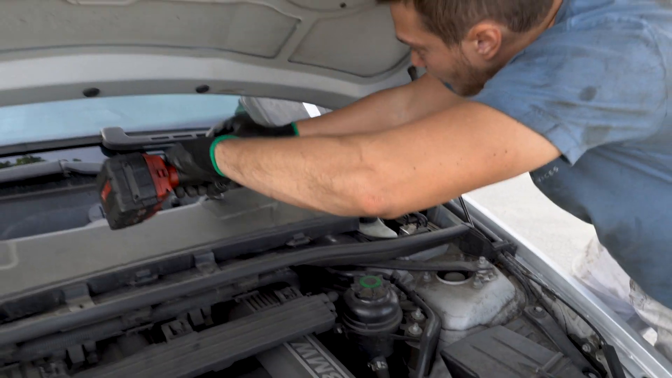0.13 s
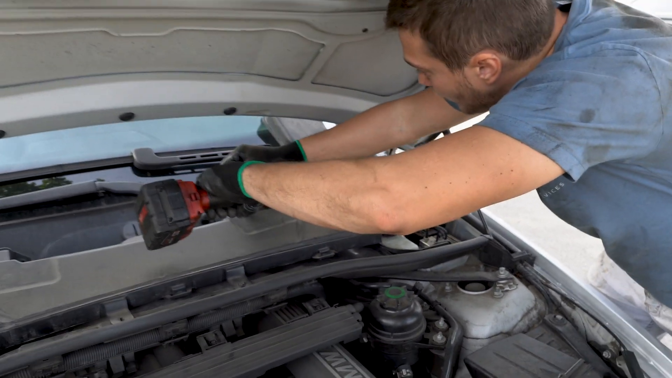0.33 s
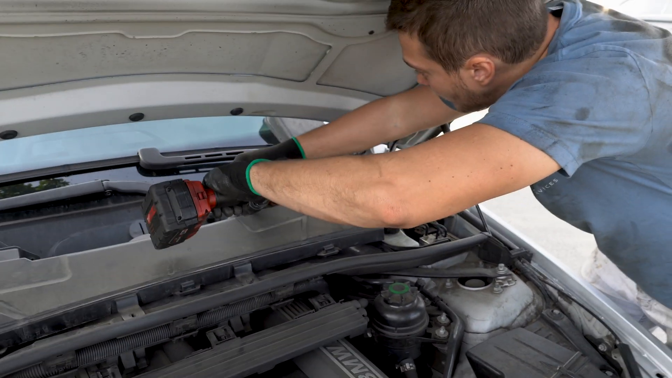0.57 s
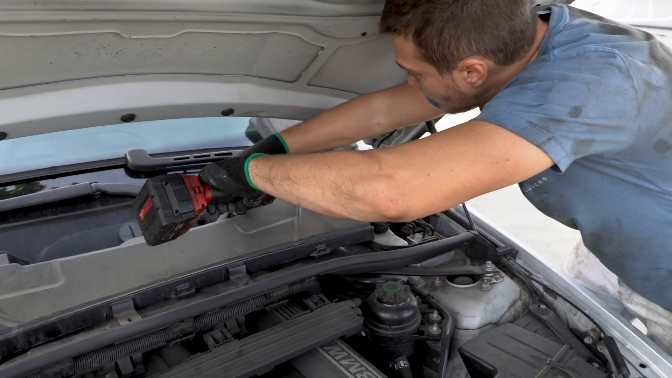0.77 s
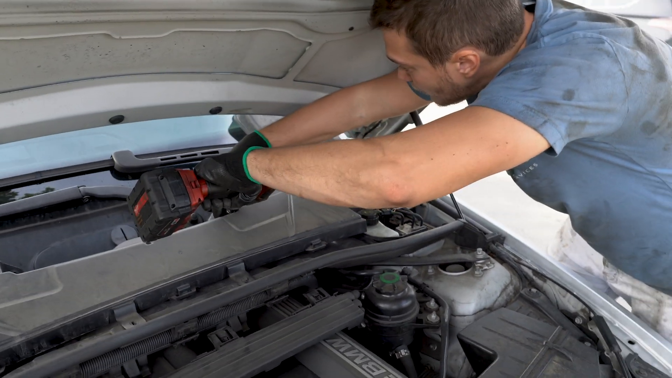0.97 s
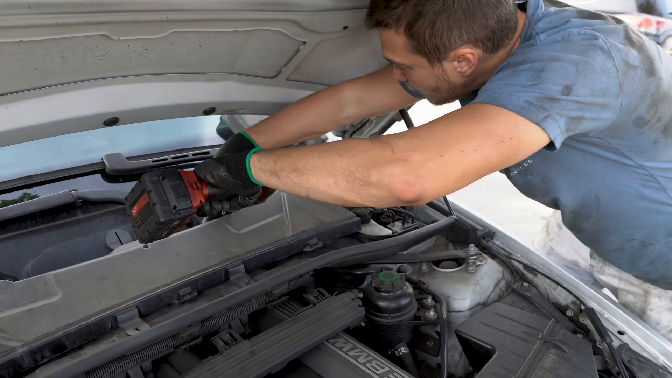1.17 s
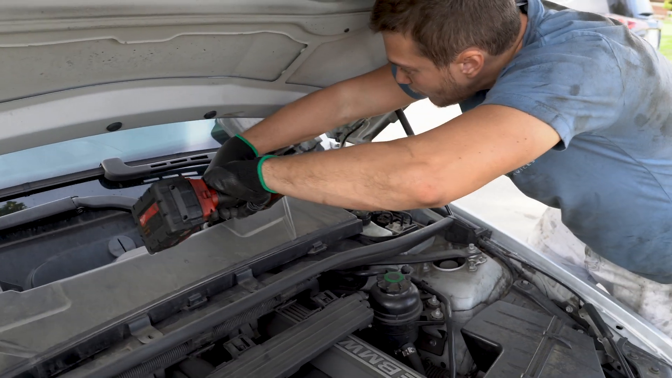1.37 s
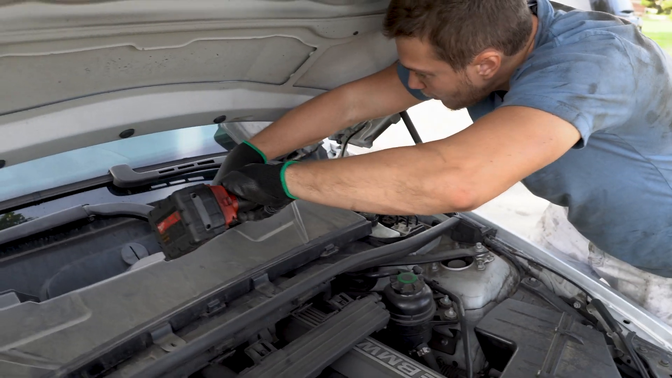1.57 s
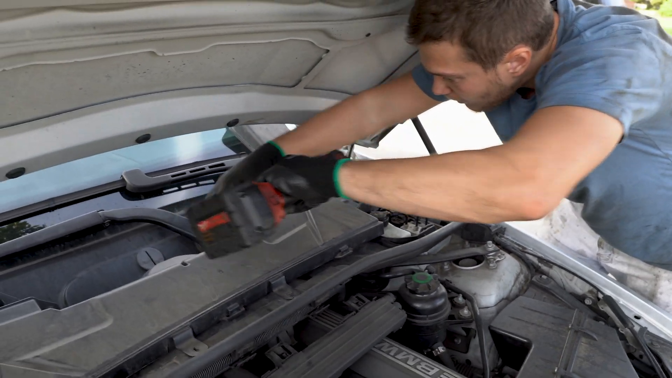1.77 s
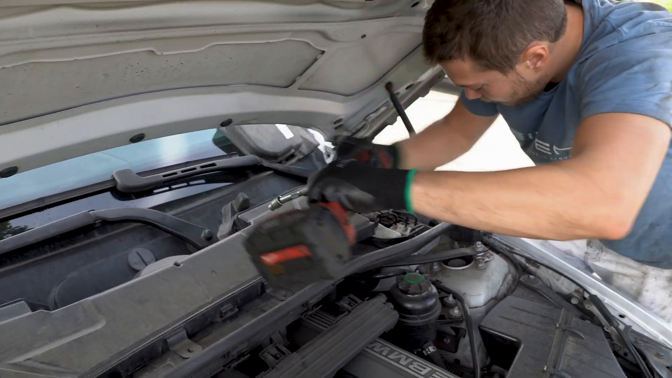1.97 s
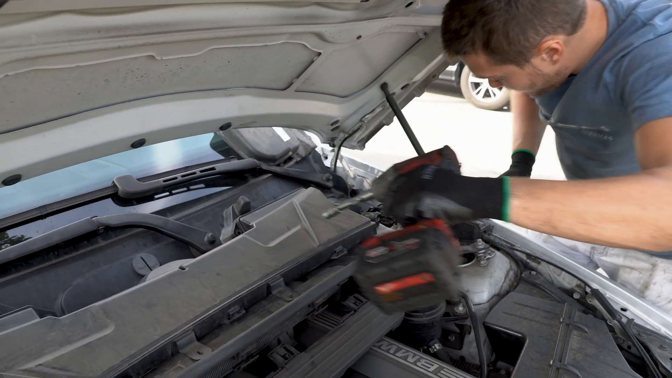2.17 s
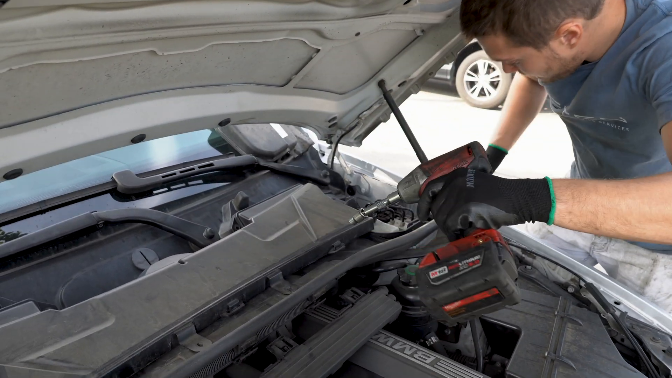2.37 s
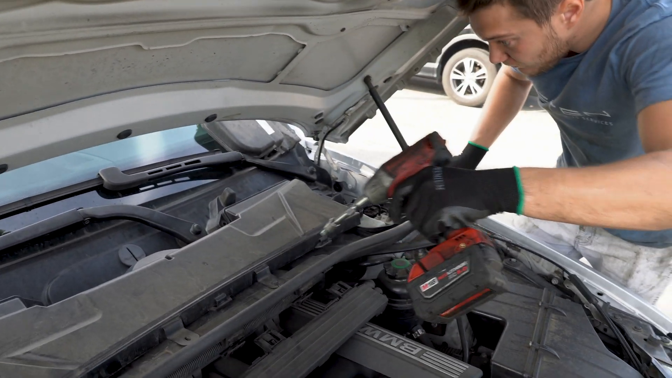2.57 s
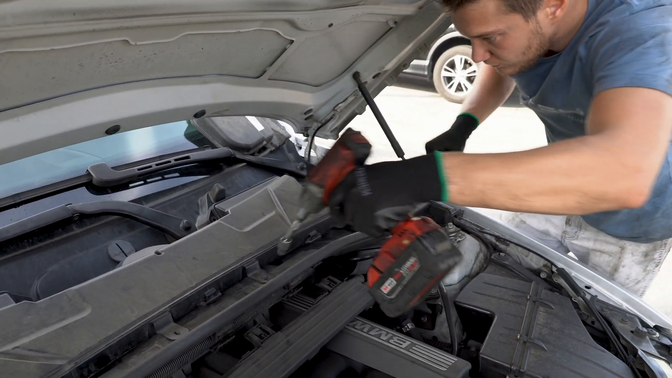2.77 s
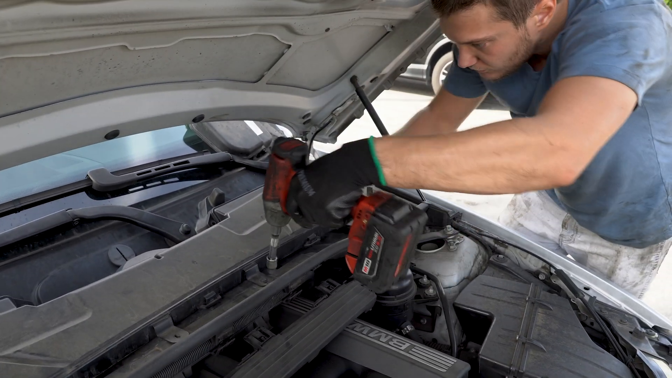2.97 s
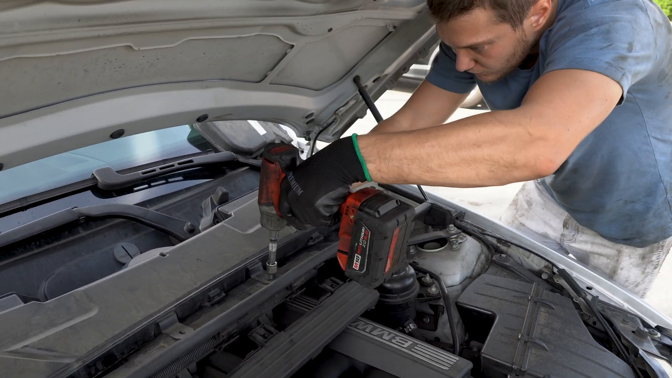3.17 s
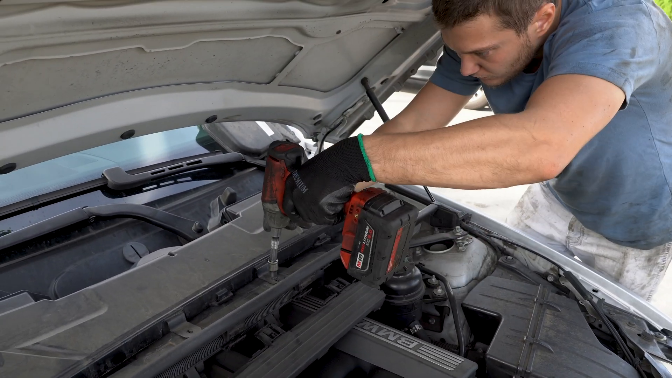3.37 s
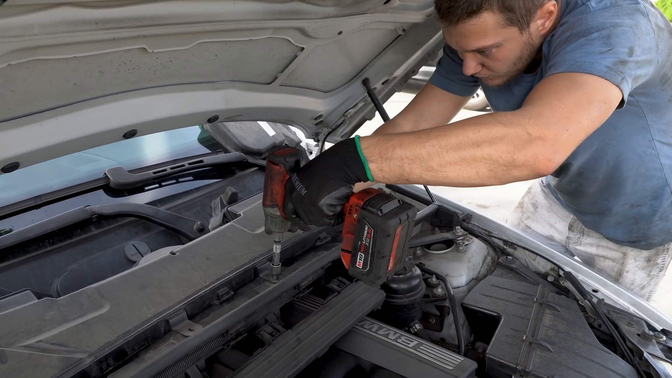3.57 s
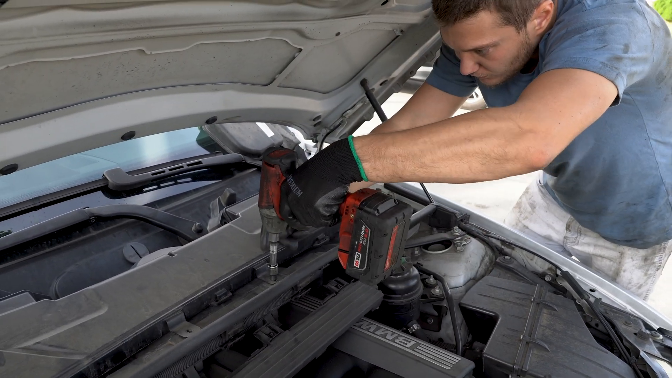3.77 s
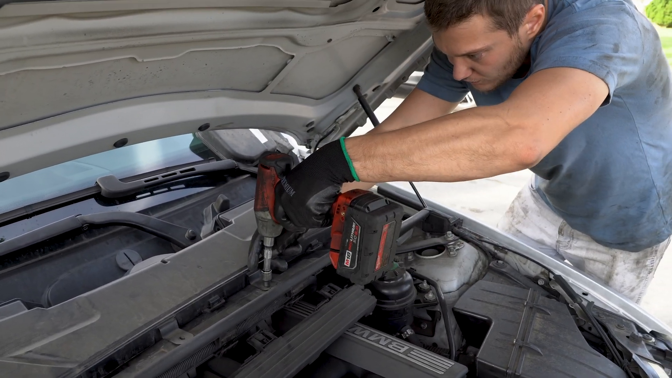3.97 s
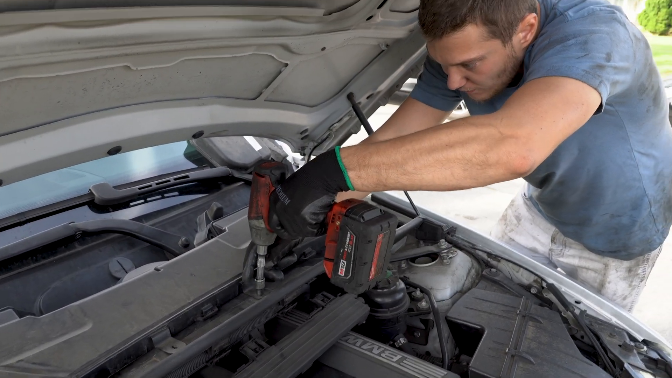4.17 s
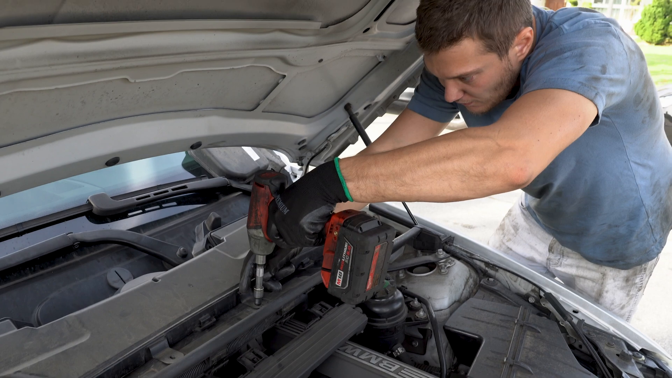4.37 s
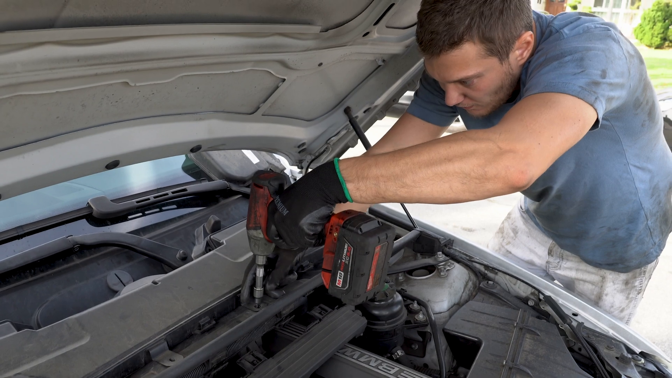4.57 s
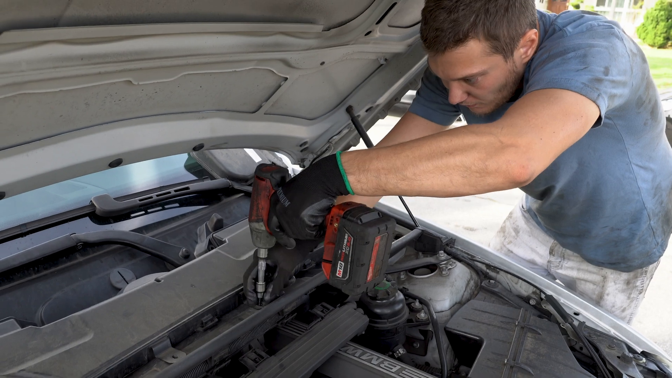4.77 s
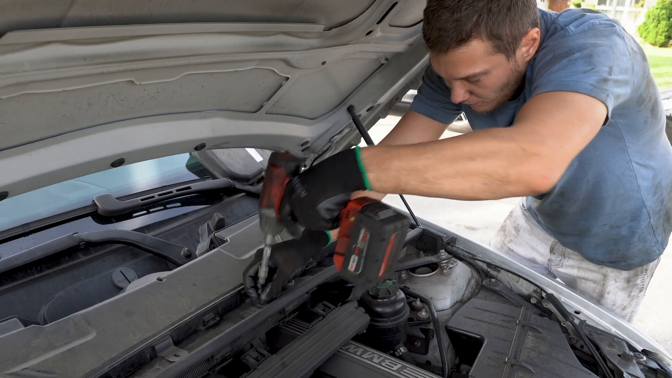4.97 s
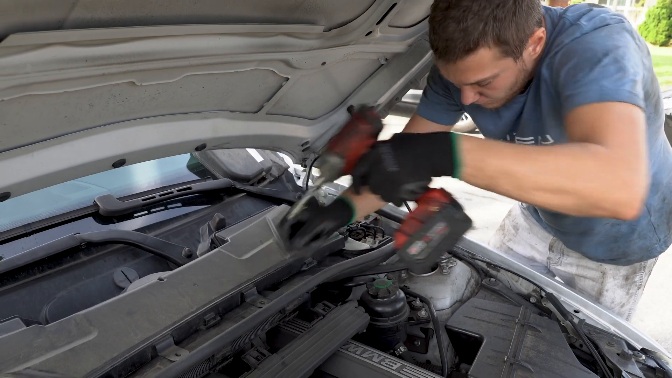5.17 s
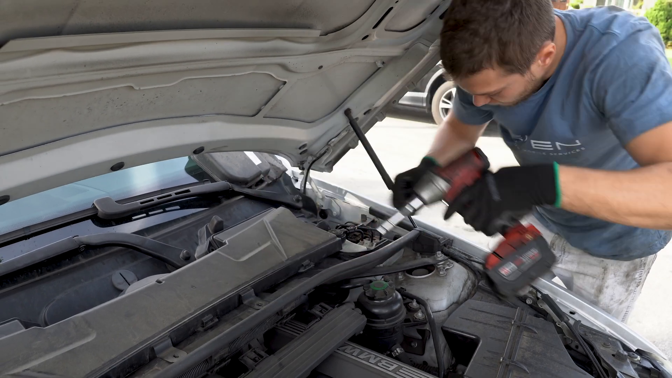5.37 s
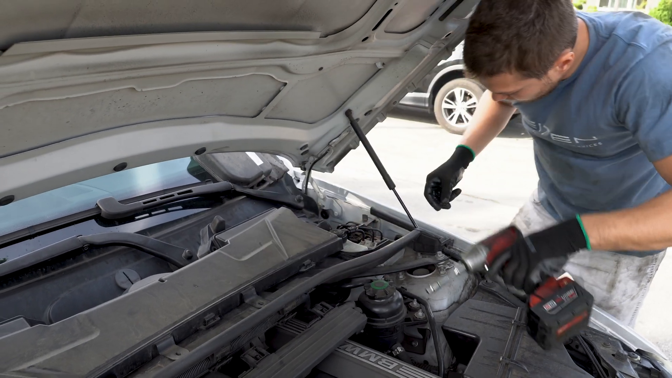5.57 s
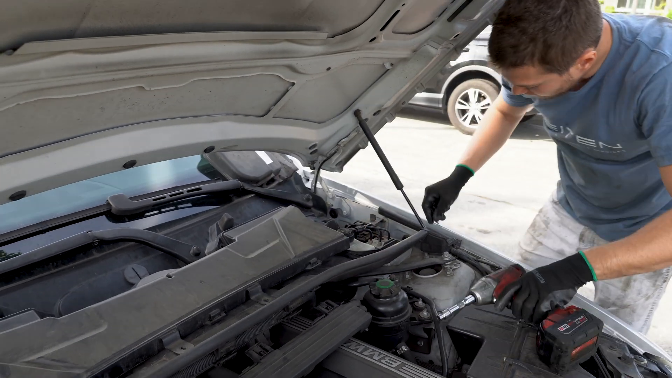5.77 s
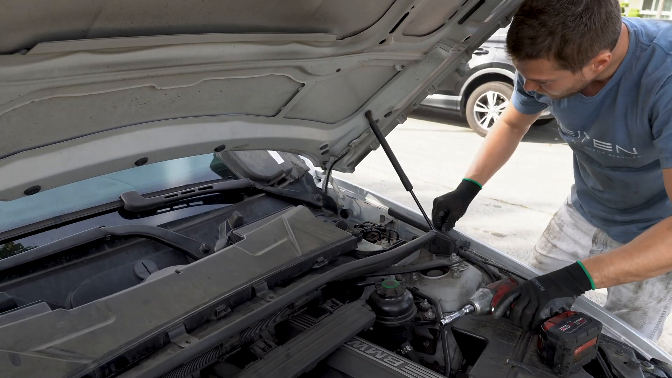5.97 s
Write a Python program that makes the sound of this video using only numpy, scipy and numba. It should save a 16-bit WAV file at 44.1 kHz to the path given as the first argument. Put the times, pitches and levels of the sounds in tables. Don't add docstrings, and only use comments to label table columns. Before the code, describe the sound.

A cordless driver whirs in two short, rattling bursts with a piercing high whistle, between plastic knocks, small metal clicks and a dropped bolt bouncing on steel.

```python
import sys
import numpy as np
from scipy import signal
from scipy.fft import rfft, irfft
from scipy.io import wavfile
from scipy.ndimage import uniform_filter1d
from numba import njit

SR = 44100
rng = np.random.default_rng(int(sys.argv[2]) if len(sys.argv) > 2 else 0)


def linear_from_db(decibels):
    return 10 ** (np.asarray(decibels, float) / 20)


def pcm_store(signal):
    levels = np.round(np.clip(np.atleast_2d(signal), -1, 1) * 32767)
    wavfile.write(sys.argv[1], SR, levels.astype(np.int16).T)


N = 265570
TIME = np.arange(N) / SR
FREQ = np.maximum(np.arange(N // 2 + 1) * SR / N, 1)

# [t/s, electrical f/Hz]
MOTOR_SPEED = [
    [(.838, 10), (.866, 235), (.935, 311), (1.17, 316), (1.225, 452), (1.3, 507), (1.36, 572), (1.44, 601),
     (1.5, 580)],
    [(4.327, 5), (4.345, 175), (4.37, 427), (4.4, 486), (4.43, 546), (4.49, 579), (4.62, 611), (4.775, 644),
     (4.835, 610)],
]
# [t/s, level/dB]
MOTOR_CURRENT = [
    [(.838, -42.5), (.92, -42), (1.16, -42), (1.2, -31), (1.24, -37), (1.3, -36), (1.46, -35.5),
     (1.48, -48)],
    [(4.328, -37.5), (4.345, -35), (4.4, -31), (4.5, -29.5), (4.77, -28), (4.793, -30)],
]
# [t/s, gear hiss level/dB, pressure on the cowl/dB]
SHAFT_LOAD = [
    [(.835, -36, -19), (.89, -40, -9), (.95, -44.5, -5), (1.15, -41, 0), (1.35, -38, 0.5), (1.43, -39, 4.5),
     (1.48, -41.5, 7), (1.52, -39, 7), (1.58, -75, 19.5)],
    [(4.331, -47.5, -7.5), (4.345, -39.5, -15.5), (4.37, -29, -18), (4.42, -34, -1.5), (4.5, -37, -1),
     (4.7, -38, -4), (4.83, -39, 0.5), (4.85, -52.5, 9), (4.9, -73, -4)],
]
# order in multiples of the speed, then level/dB under the lower sideband per burst
SIDEBAND_ORDERS = (-3, -.5, 0, .5, 2)
SIDEBAND_DB = [
    (-28, -21, -19, -43, -28),
    (-30.5, -30.5, -33.5, -22.5, -40.5),
]
# order (whole for poles, the rest tooth meshes), then level/dB per burst
GEAR_TONE_ORDERS = (3, 3.28, 4, 4.72, 5, 6.32, 7.9, 9.48, 11.06, 12.64)
GEAR_TONE_DB = [
    (-49, -54, -43, -45, -46, -58, -63, -63, -65, -67),
    (-44, -47, -48, -46, -45, -60, -62, -61, -61, -62),
]
# [f/Hz, level/dB]
GEAR_CASE = [(1000, -14.5), (1800, -2), (3300, 0), (4500, 5.5), (8000, 1.5)]
# [t/s, length/s, depth/dB]
LOWER_SIDEBAND_FADES = [(1.335, 0.074, 7), (1.42, 0.078, 1.5)]
UPPER_SIDEBAND_FADES = [(.98, 0.34, 9.1), (1.2, .05, 16), (1.32, 0.11, 5.5), (1.42, .07, 22),
                        (4.4, 0.055, 7.2), (4.68, 0.41, 16), (4.68, .11, 14), (4.76, .1, 8)]
SECOND_SIDEBAND_FADES = [(.85, .1, 8), (1.22, 0.48, 14)]
# [t/s, length/s, depth/dB]
FIFTH_POLE_FADES = [
    (1.38, .08, 4),
    (4.55, .2, 12),
]
# [t/s, length/s, depth/dB]
GEAR_TONE_FADES = [
    (1.25, .24, 5),
    (1.51, 0.12, 18),
    (4.84, .13, 14),
]
# [t/s, length/s, level/dB]
SOCKET_CHATTER = [(.965, 0.033, 2), (1.008, 0.038, 7), (1.022, 0.035, 3), (1.1, 0.017, -2),
                  (1.12, 0.022, -3), (1.136, 0.076, 2.5), (1.204, 0.033, 0), (1.247, 0.03, 7.5),
                  (1.3, 0.037, 1), (1.326, 0.011, 0.5), (1.443, 0.035, 1), (4.452, 0.014, 1.5),
                  (4.492, .015, 3), (4.513, 0.018, -1), (4.554, .015, 2.5), (4.587, .03, 2),
                  (4.632, 0.016, 4.5), (4.655, 0.023, 4.5), (4.715, .02, 2.5), (4.77, 0.046, 5)]
# [f/Hz, level/dB per Hz]
TOOL_SPECTRUM = [(100, -1.5), (170, 1.5), (350, -13), (600, -11.5), (1400, -18), (3000, -15), (5000, -19),
                 (7000, -26), (9000, -27), (11000, -28.5), (14000, -30), (16000, -32.5)]
# [hiss/dB, sizzle/dB]
TURN_SWELL = [
    (2.1, 16),
    (1.2, 5),
]
# [f/Hz, width/Hz, level/dB]
COWL_PEAKS = [(154, 39, 9.5), (356, 30, 5.5), (447.8, 36, 6.5), (744, 38, 0), (870, 77, 2), (1050, 200, 3),
              (1454, 14, 6.5), (1570, 27, -5), (2210, 130, -1), (2860, 140, 4)]
RIM_PEAKS = [(168.7, 43, 3.5), (505, 99, 9), (1060, 69, 6), (1410, 180, 8.5), (2080, 120, -3.5),
             (2820, 100, 0)]
HOUSING_PEAKS = [(3006, 340, 2), (3900, 170, 1), (4100, 200, 2), (5780, 150, 6.5), (6150, 150, 1.5),
                 (8720, 1500, 9), (13820, 2200, 9)]
TRAY_PEAKS = [(400, 120, 6), (910, 80, 5), (1670, 120, 3), (2050, 200, 4), (2950, 250, 4), (3630, 200, 3),
              (4230, 250, 2.5)]
COVER_PEAKS = [(196, 29, 6), (337, 99, -6), (540, 32, -2), (1550, 130, -5), (8150, 3100, 10)]
# [t/s, level/dB, weight/dB, hardness/dB]; weight lifts the low ring, hardness the edge
COWL_RAPS = [(.189, -30.5, 16, -5), (.2907, -73, 41, 3), (.3256, -43, 25, -15), (.3647, -58.5, 31.5, -8),
             (.399, -61, 29, 0), (.4149, -49.5, 19, -2), (.4296, -29.5, 16.5, -6), (.5177, -58, 15, -23),
             (4.3865, -39, 32, 12)]
COWL_CLUNKS = [(.4631, -26, 11, -9), (.6532, -68, 29, -8), (.832, -21, -0.5, -0.5), (.8644, -23.5, 8.5, 4),
               (1.7812, -43, -5, -18), (4.3772, -13, -11, 3), (4.3838, -8.5, -3.5, 2),
               (4.4055, -17.5, -5, -1.5)]
COVER_TAPS = [(3.0609, -42.5, -0.5, -22), (3.268, -46.5, 4, -13.5), (3.6835, -33, 1.5, -15),
              (3.688, -31, -11, -10), (3.699, -26, 1.5, 6), (3.712, -50, -10, 10), (3.735, -63, -12, 9),
              (5.801, -39, 0.5, -12), (5.8416, -46.5, 15, -14), (5.857, -45, 0, -26),
              (5.9487, -50.5, 2, -25)]
BOLT_BOUNCES = [(2.6505, -29, -6, 6.5), (2.6548, -14.5, -16.5, 5), (2.6614, -19.5, -21, 0.5),
                (2.6716, -21.5, -7, -5.5), (2.6862, -22.5, -12.5, 4), (2.6996, -30.5, -7, -7),
                (2.7196, -34.5, -2, -5.5), (2.7502, -43, -6, -6)]
LATCH_CLICKS = [(.0907, -57.5, 12, 6), (.205, -54, 0, -7), (.215, -69, 0, -12), (1.1115, -31.5, -2, -16),
                (1.503, -34, 8, -5), (1.51, -33.5, 1, -4), (1.5304, -39, -6, 6), (1.5594, -39.5, 4, 5),
                (1.5884, -51.5, 1, -3), (2.2623, -45, -14, -2.5), (4.3284, -33, -11.5, -20),
                (4.8094, -36, -14.5, 4), (4.8294, -31, -21, -7), (4.8745, -41, -9, -6.5),
                (5.8814, -62.5, -5, 6), (5.037, -60, 2, 11.5), (5.8017, -60, 0, 2), (5.8416, -64, 0, 5),
                (5.41, -63, 0, 2.5), (5.472, -76, 3, 8.5), (4.455, -50, -10, 14), (4.515, -41.5, -10, 13.5),
                (4.586, -48, -12, 15), (4.65, -43.5, -12, 12), (4.712, -46, -10, 14), (4.744, -47, -14, 15)]
SOCKET_CLICKS = [(.0184, -64, 18, 11.5), (.0774, -78, 17, 16), (.7768, -49.5, -6, 3.5),
                 (2.0194, -77, 0, 20), (2.9038, -54, 1, -8), (3.3054, -61.5, 12, 8),
                 (3.5545, -18.5, -29, -14), (3.5824, -40.5, 5, -2), (3.593, -28, -4, -8),
                 (3.6022, -23.5, -14, -8.5), (4.0761, -52.5, 3, 1), (4.9965, -41.5, -0.5, -5),
                 (5.065, -57, 2, -3)]
# [t/s, knock level/dB, panel boom level/dB, ring level/dB]
COWL_BUMPS = [(0.984, -33.5, -18, -30.5), (1.113, -18.5, -28.5, -31), (1.228, -23.5, -29, -36),
              (1.256, -30, -24, -30), (1.287, -35, -20, -47), (1.301, -23.5, -26, -49),
              (1.323, -24, -21, -28), (1.349, -24.5, -29, -42), (1.377, -17, -23, -31),
              (1.406, -20, -39, -42), (1.434, -15.5, -31, -27), (1.45, -27.5, -17.5, -44),
              (4.437, -37.5, -34.5, -47.5), (4.49, -38, -34.5, -21), (4.542, -43, -42.5, -29.5),
              (4.564, -29, -31, -20.5), (4.601, -38, -38, -27), (4.632, -29.5, -32, -24),
              (4.647, -41, -37, -39)]
# [t/s, level/dB, tilt/dB per octave]
COWL_EDGE_MODES = [(301, -9, 0.14), (648, 0, .045), (835, -8, 0.0646), (985, -13, 0.11), (1110, -24, -0.05),
                   (1372, 0, -0.02), (3370, -12, -0.0444)]
COWL_EDGE_HITS = [(.1897, -18, 1), (.178, -48, 0), (0.41, -35, -2.9), (.3655, -40.5, -1.6), (.2907, -54, 0),
                  (.4308, -27.5, -1), (.4358, -22.5, 0), (.5195, -39.5, -0.18)]
COWL_PANEL_MODES = [(159.4, 0.5, 0.11), (341, -7.5, 0.099), (451, -1.5, 0.08), (693, 0.5, 0.031),
                    (880, -6.5, 0.036), (1110, -11, 0.065), (1409, -13.5, 0.048), (2075, -12, 0.015),
                    (3820, -15, 0.0079), (4520, -12, 0.013)]
COWL_PANEL_HITS = [(.4666, -21, 0.5), (.8322, -12.5, 3.5), (.8658, -14, 2), (.825, -42, -4), (.99, -35, -4),
                   (1.113, -36, -1), (1.437, -38, -6)]
COWL_RIM_MODES = [(170, -8, 0.1), (510, -11, 0.11), (1140, -12, 0.083), (1497, 2, 0.025), (2100, -4, .025),
                  (2232, -2.5, .025), (2502, -8, 0.036), (2874, -3, 0.024), (3580, -5.5, 0.021),
                  (3970, -10.5, 0.014), (5250, -14.5, 0.025)]
COWL_RIM_HITS = [(3.5548, -26, 1), (3.5824, -29, 1.5), (3.593, -25, 1), (3.6024, -19.5, 0.5),
                 (4.3778, -16.5, 2.5), (4.3838, -9, 2.5), (4.4062, -19.5, 0), (4.545, -30.5, -1.5),
                 (4.566, -27.5, -4.5), (4.631, -25.5, -5)]
STEEL_TRAY_MODES = [(362, -11, 0.067), (564, -15.5, 0.12), (850, -16.5, 0.3), (907, -13, 0.25),
                    (1685, -6.5, .07), (1996, -11, .08), (2090, -0.5, 0.15), (2890, -10, 0.052),
                    (3000, -2, 0.099), (3650, -0.5, 0.083), (3960, -12, .08), (4340, -2, 0.064),
                    (4720, -8.5, 0.083), (7590, 3, 0.033)]
STEEL_TRAY_HITS = [(2.6553, -24.5, 0.5), (2.6585, -29.5, -0.4), (2.6716, -36, -4), (2.6862, -33.5, -1),
                   (2.6996, -37.5, -1)]
ENGINE_COVER_MODES = [(195, -3.5, 0.083), (452, -16.5, .06), (510, 0, .12), (860, -11, .04),
                      (1070, -7.5, 0.06), (1500, -13, 0.036)]
ENGINE_COVER_HITS = [(3.6878, -24.5, 2.4), (3.699, -21, 0.57), (4.385, -20.5, 0)]
ANVIL_RING_MODES = [(2250, -8, 0.05), (2450, -6.5, 0.2), (2920, -0.5, 0.14), (3110, -3, 0.03),
                    (3340, -3, 0.24), (3900, -3, 0.14)]
ANVIL_RING_HITS = [(.955, -42, -3), (1.012, -37, -1), (1.078, -41, -1.5), (1.138, -37, 0), (1.198, -42, 0),
                   (1.24, -37, -2.5), (1.29, -42, -6)]
# [f/Hz, level/dB, t60/s]
SET_DOWN_MODES = [(165, -21.5, 0.04), (363, -18, 0.029), (495, -14, 0.022), (690, -20.5, 0.032)]
# [t/s, length/s, level/dB]
CLOTH_STROKES = [(0, 0.24, -65), (0.1, 0.069, -61), (.4, 1, -73.5), (1.59, 0.11, -62.5), (1.785, 0.55, -69),
                 (2.33, 0.44, -67.5), (2.512, 0.084, -62), (2.696, 0.38, -61.5), (4.05, 0.39, -71.5),
                 (4.912, 0.57, -64.5), (5.061, 0.098, -64), (5.356, 0.29, -63.5), (5.6, 0.35, -69),
                 (5.952, 0.71, -68.5)]
# [f/Hz, level/dB per Hz]
YARD_SPECTRUM = [(8.8, -33.5), (15, 13), (44, -6.5), (92, -4), (226, -17), (1550, -26.5), (8670, -59.5),
                 (16000, -91)]
# [t/s, level/dB]
HUM_TONES = [(86.1, -60), (172.3, -73), (259, -73), (344.5, -63), (430.7, -73), (516.8, -76.5),
             (866.7, -75)]
HUM_COURSE = [(0, 7), (.6, 2.5), (1.7, 5.5), (2.2, -6), (3.6, -1.5), (3.85, 5.5), (4.4, 5), (5, 1),
              (6.02, 1)]

SWITCHING_HZ = 9941
GEAR_RATIO = 20.0
# anvil position at the start in turns, then levels in dB
RATTLE_START = (0.4, 0.43)
UPPER_DB, SECOND_DB = (-8, -3), (-7, -18.5)
BOOM_DB, SIZZLE_DB = (-4.5, 0), (-15.5, -14.5)
POLE_DB_PER_DECADE, TOOTH_DB_PER_DECADE = 35, 8
PATCHY_DB = 1.7
THUD_S, THUD_PUSH_S = 5.8298, 0.001
CLOTH_DB = -72.5
SQUEAK_S, SQUEAK_LENGTH_S, SQUEAK_DB = 4.21, 0.36, -64
SQUEAK_HZ, SQUEAK_SAG_HZ_PER_S = 1400, 130
PASSING_S, PASSING_LENGTH_S, PASSING_DB = 4.27, 0.4, -65
YARD_DB, HISS_DB = -46, -93.5
BONNET_T60_S, BONNET_DB = 0.15, -22


def driver():
    lower_lost = fades(LOWER_SIDEBAND_FADES)
    upper_lost = fades(UPPER_SIDEBAND_FADES)
    second_lost = fades(SECOND_SIDEBAND_FADES)
    gear_gain = linear_from_db(-fades(GEAR_TONE_FADES))
    pole_lost = fades(FIFTH_POLE_FADES)
    out = 0
    for k, run in enumerate(MOTOR_SPEED):
        turning, (speed,) = curves(run)
        turns = np.cumsum(speed * (TIME > run[0][0])) / SR
        powered, (current_db,) = curves(MOTOR_CURRENT[k])
        lower_db = current_db - lower_lost
        upper_db = current_db + UPPER_DB[k] - upper_lost
        second_db = current_db + SECOND_DB[k] - second_lost
        out = out + whistle(powered, turns, SIDEBAND_DB[k], lower_db, upper_db, second_db)
        out = out + gears(turning * gear_gain, speed, turns, GEAR_TONE_DB[k], pole_lost)
        shake = [(s, db + press + BOOM_DB[k], db + press, db, db + SIZZLE_DB[k])
                 for s, db, press in SHAFT_LOAD[k]]
        rattle = turns / GEAR_RATIO + RATTLE_START[k]
        out = out + shaking(shake, rattle, (COWL_PEAKS, RIM_PEAKS)[k], *TURN_SWELL[k])
    return out


def whistle(gate, turns, side_db, lower_db, upper_db, second_db):
    def tone(order):
        return np.sqrt(2) * np.sin(2 * np.pi * (SWITCHING_HZ * TIME + order * turns + rng.random()))

    out = linear_from_db(lower_db + 1.0 * walk(27)) * tone(-1)
    out += linear_from_db(upper_db + 1.5 * walk(25)) * tone(1)
    out += linear_from_db(second_db + 2.0 * walk(30)) * tone(-2)
    for order, db in zip(SIDEBAND_ORDERS, side_db):
        out += linear_from_db(lower_db + db + 3.0 * walk(27)) * tone(order)
    return gate * out


def gears(gate, speed, turns, gear_db, lost_db):
    out = 0
    for order, db in zip(GEAR_TONE_ORDERS, gear_db):
        is_pole = order % 1 == 0
        rate, growth_db = (30, POLE_DB_PER_DECADE) if is_pole else (90, TOOTH_DB_PER_DECADE)
        wobble = 0.1 * order * walk(rate)
        flicker_db = 3 * walk(rate) - lost_db * (order == 5)
        speed_db = growth_db * np.log10(speed / 600)
        level_db = db + tilt(order * speed, GEAR_CASE) + speed_db + flicker_db
        out = out + linear_from_db(level_db) * np.sin(2 * np.pi * order * turns + wobble)
    return gate * np.sqrt(2) * out


def shaking(table, rattle, body, hiss_swell_db, sizzle_swell_db):
    gate, levels = curves(table)
    colour = linear_from_db(tilt(FREQ, TOOL_SPECTRUM)) * peaks(FREQ, body + HOUSING_PEAKS)
    swell = np.exp(1.3 * (np.cos(2 * np.pi * rattle) - 1)) - 0.4
    chatter_db = fades(SOCKET_CHATTER)
    moves_db = [1.1 * swell, 1.1 * swell + 0.28 * chatter_db,
                hiss_swell_db * swell + chatter_db, sizzle_swell_db * swell]
    # (low edge Hz, high edge Hz, flicker dB, grain spread dB)
    parts = [(110, 300, 1.2, 1.5), (300, 1350, 1.2, 2.2), (1350, 10800, 0.8, 2.5), (10800, 17500, 1.3, 2)]
    out = 0
    for level_db, move_db, (lo_hz, hi_hz, flicker_db, grain_db) in zip(levels, moves_db, parts):
        grains = rng.standard_normal(N) * linear_from_db(grain_db * walk(400))
        noise = shaped(grains, colour * band(lo_hz, hi_hz))
        out = out + linear_from_db(level_db + move_db + flicker_db * walk(50)) * noise
    return gate * patchy(out)


def patchy(x):
    z = signal.stft(x, nperseg=512)[2]
    field = uniform_filter1d(rng.standard_normal(z.shape), size=6, axis=0)
    field = uniform_filter1d(field, size=4, axis=1)
    return signal.istft(z * linear_from_db(PATCHY_DB * unit(field)), nperseg=512)[1][:N]


def handling():
    knocks = contact(COWL_RAPS, boom_db=-25.5, top_db=-10) + contact(COWL_CLUNKS, boom_db=-9, top_db=-2)
    bumps = [(s, mid_db, boom_db, body_db, mid_db - 36, mid_db - 47)
             for s, body_db, boom_db, mid_db in COWL_BUMPS]
    taps = contact(COVER_TAPS, boom_db=-10, top_db=-23)
    bounces = contact(BOLT_BOUNCES, boom_db=-25.5, top_db=-4.5)
    clicks = contact(LATCH_CLICKS, boom_db=-6, top_db=-5) + contact(SOCKET_CLICKS, boom_db=-5.5, top_db=-27)

    out = blows(knocks, COWL_PEAKS, ring_s=0.051, slope=0.32, spread_s=0.0011, gain_db=-0.36)
    out += blows(bumps, COWL_PEAKS, ring_s=0.036, slope=0.31, spread_s=0.0039, gain_db=0.6)
    out += blows(taps, COVER_PEAKS, ring_s=0.077, slope=0.65, spread_s=0.0012, gain_db=1.0)
    out += blows(bounces, TRAY_PEAKS, ring_s=0.092, slope=0.29, spread_s=0.0006, gain_db=-3.5)
    out += blows(clicks, HOUSING_PEAKS, ring_s=0.052, slope=0.42, spread_s=0.00068, gain_db=2.9)

    out -= rings(COWL_EDGE_HITS, COWL_EDGE_MODES)
    out -= rings(COWL_PANEL_HITS, COWL_PANEL_MODES)
    out += rings(COWL_RIM_HITS, COWL_RIM_MODES)
    out += rings(ENGINE_COVER_HITS, ENGINE_COVER_MODES)
    out += rings(STEEL_TRAY_HITS, STEEL_TRAY_MODES)
    out += rings(ANVIL_RING_HITS, ANVIL_RING_MODES)
    return out + thud()


def contact(table, boom_db, top_db):
    return [(s, db, db + weight + boom_db, db + weight, db + hard, db + hard + top_db)
            for s, db, weight, hard in table]


def blows(table, body, ring_s, slope, spread_s, gain_db):
    out, count = np.zeros(N), 300
    grid = 120 + 15800 * (np.arange(count) / count) ** 2
    share = np.sqrt(np.gradient(grid) / grid)
    for s, mid_db, boom_db, body_db, edge_db, top_db in table:
        detune, spread, delay, sign = rng.random((4, count))
        hz = grid * (1 + 0.02 * (detune - 0.5))
        resonance = peaks(hz, body)
        colour = tilt(hz, [(170, boom_db), (600, body_db), (2200, mid_db), (6200, edge_db), (13000, top_db)])
        size = linear_from_db(colour + gain_db) * share * resonance * linear_from_db(3.8 * (spread - 0.5)) * np.sign(sign - 0.5)
        t60 = ring_s * (hz / 1000) ** -slope * resonance ** 0.33
        start = ((s - spread_s * np.log(delay)) * SR).astype(np.int64)
        add(out, start, decay_pole(hz, t60), np.exp(-2 * hz / SR), size + 0j, (t60 * SR).astype(np.int64))
    return out


def rings(hits, modes):
    out = np.zeros(N)
    hz, mode_db, t60 = np.transpose(modes)
    t60 = np.maximum(t60, 0.008)
    pole, length = decay_pole(hz, t60), (t60 * SR).astype(np.int64)
    for s, db, tilt_db in hits:
        size = linear_from_db(db + mode_db + tilt_db * np.log2(hz / 1000)) + 0j
        add(out, np.full(len(hz), int(s * SR)), pole, np.exp(-4 * hz / SR), size, length)
    return out


def thud():
    t = np.maximum(TIME - THUD_S, 0)
    out = 0
    for hz, db, t60 in SET_DOWN_MODES:
        out = out + linear_from_db(db) * np.exp(-np.log(1000) * t / t60) * np.sin(2 * np.pi * hz * t)
    return (1 - np.exp(-t / THUD_PUSH_S)) * out


def decay_pole(hz, t60):
    return np.exp(2j * np.pi * hz / SR - np.log(1000) / (t60 * SR))


@njit
def add(out, start, pole, rise, size, length):
    for k in range(len(start)):
        z, lack = size[k], 1.0
        for i in range(start[k], min(start[k] + length[k], len(out))):
            out[i] += z.imag * (1 - lack)
            z *= pole[k]
            lack *= rise[k]


def rustle():
    level = linear_from_db(CLOTH_DB)
    for s, length_s, db in CLOTH_STROKES:
        level = level + (linear_from_db(db) - linear_from_db(CLOTH_DB)) * hump(s, length_s)
    grit = rng.standard_normal(N) * linear_from_db(1.2 * walk(130))
    colour = (band(3000, 7900) + linear_from_db(-13.5) * band(9500, 19000)) * (FREQ / 5000) ** -0.5
    return level * shaped(grit, colour)


def squeak():
    t = TIME - SQUEAK_S
    phase = 2 * np.pi * (SQUEAK_HZ - SQUEAK_SAG_HZ_PER_S * t / 2) * t
    return linear_from_db(SQUEAK_DB) * hump(SQUEAK_S, SQUEAK_LENGTH_S) * np.sin(phase)


def passing():
    noise = shaped(rng.standard_normal(N), band(1500, 3500))
    return linear_from_db(PASSING_DB) * hump(PASSING_S, PASSING_LENGTH_S) * noise


def yard():
    spectrum = rfft(rng.standard_normal(N)) * linear_from_db(tilt(FREQ, YARD_SPECTRUM))
    noise = 0
    for hz in 16 * 2.0 ** np.arange(10):
        octave = np.cos(np.pi / 2 * np.clip(np.log2(FREQ / hz / 1.4), -1, 1)) ** 2
        noise = noise + irfft(spectrum * octave, N) * linear_from_db(1.0 * walk(5.4))
    hum = 0
    for hz, db in HUM_TONES:
        phase = 2 * np.pi * hz * TIME + 0.94 * walk(5.0)
        hum = hum + linear_from_db(db + 2.1 * walk(3.4)) * np.sqrt(2) * np.sin(phase)
    hum_db = curves(HUM_COURSE)[1][0]
    return linear_from_db(YARD_DB) * unit(noise) + hum * linear_from_db(hum_db)


def hiss():
    return linear_from_db(HISS_DB) * shaped(rng.standard_normal(N), band(7000, 20000))


def unit(x):
    return x / np.sqrt(np.mean(x ** 2))


def tilt(hz, points):
    f, db = np.transpose(points)
    return np.interp(np.log(hz), np.log(f), db)


def band(lo_hz, hi_hz):
    return 1 / np.sqrt((1 + (lo_hz / FREQ) ** 8) * (1 + (FREQ / hi_hz) ** 8))


def peaks(hz, modes):
    return linear_from_db(sum(db / (1 + (2 * (hz - f) / w) ** 2) for f, w, db in modes))


def shaped(x, gain):
    return unit(irfft(rfft(x) * gain, N))


def walk(rate):
    k = int(SR / rate)
    steps = np.repeat(rng.standard_normal(4096)[:N // k + 1], k)
    return 1.3 * uniform_filter1d(uniform_filter1d(steps, k), k)[:N]


def curves(table):
    s, *columns = np.transpose(table)
    gate = uniform_filter1d(1.0 * ((TIME > s[0]) & (TIME < s[-1])), size=220)
    return gate, [np.interp(TIME, s, c) for c in columns]


def hump(s, length_s):
    return np.cos(np.pi * np.clip((TIME - s) / length_s, -0.5, 0.5)) ** 2


def fades(table):
    return sum(db * hump(s, length_s) for s, length_s, db in table)


def scene():
    near = irfft(rfft(handling() + driver()) * band(78, 13500), N)
    t = TIME[:SR // 3]
    tail = rng.standard_normal(len(t)) * np.exp(-np.log(1000) * t / BONNET_T60_S) * (t > 0.004)
    tail = signal.lfilter([1], [1, -0.6], tail)
    wet = signal.fftconvolve(near, tail / np.sqrt(np.sum(tail ** 2)))[:N]
    return (near + linear_from_db(BONNET_DB) * wet + rustle() + squeak() + passing() + yard() + hiss())[None]


def low_pass(x):
    return signal.sosfilt(signal.butter(12, 16520, fs=SR, output="sos"), x)


def record(dry):
    rounded = np.tanh(0.58 * dry) / 0.62
    top = linear_from_db(-24) * band(1, 16400) ** 8 + 1 / np.sqrt(1 + (FREQ / 15800) ** 260)
    mix = irfft(rfft(rounded) * top, N)
    return low_pass(mix)


dry = scene()
out = record(dry)
pcm_store(out)
```